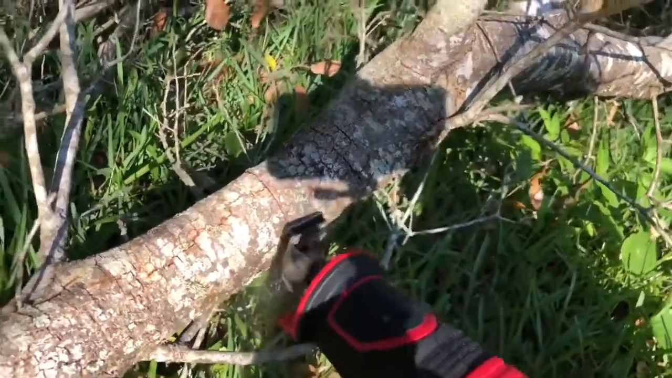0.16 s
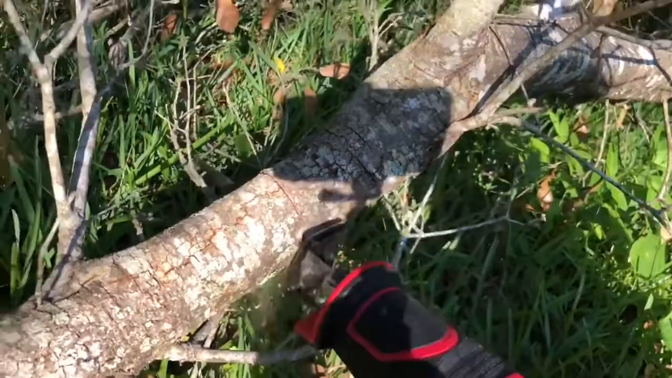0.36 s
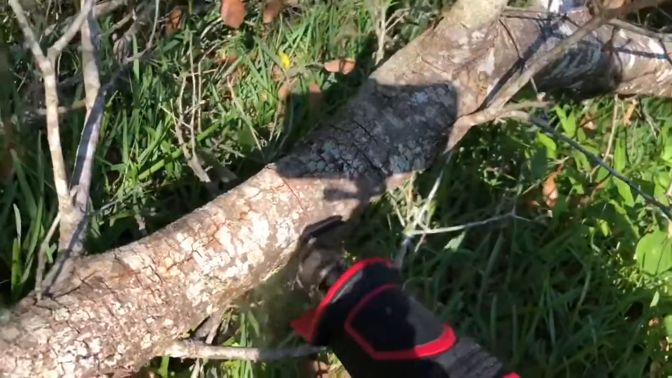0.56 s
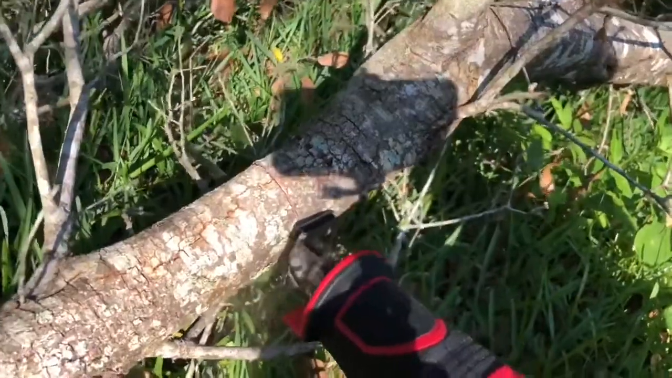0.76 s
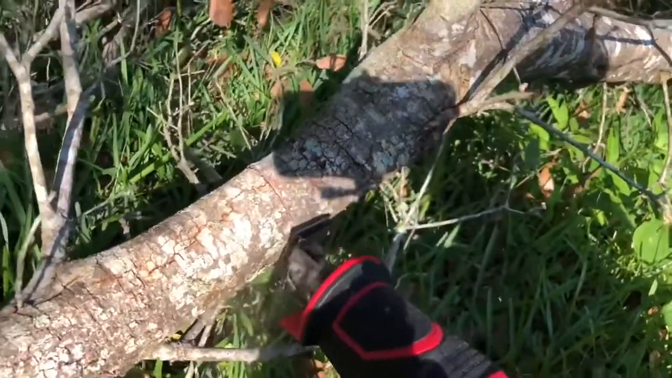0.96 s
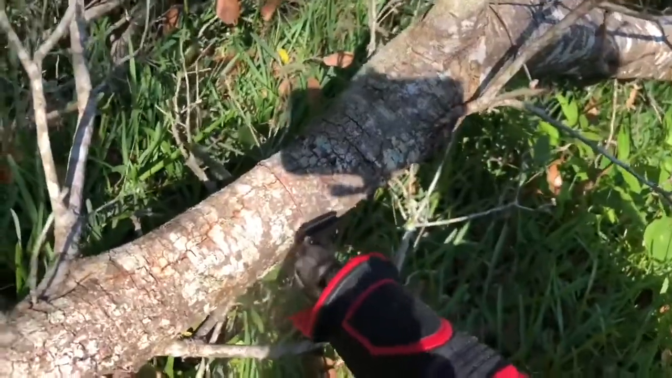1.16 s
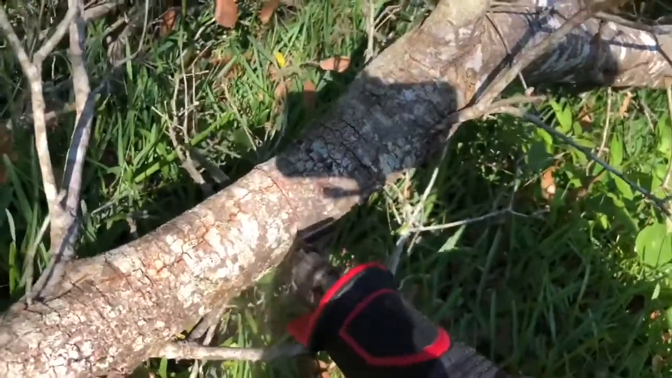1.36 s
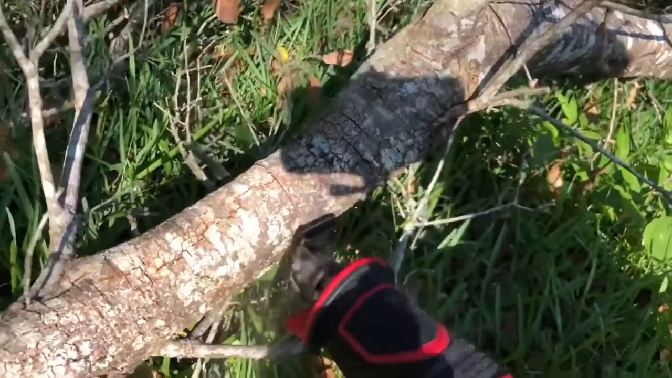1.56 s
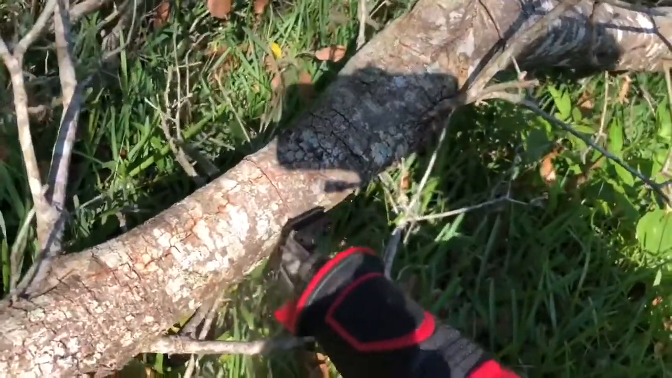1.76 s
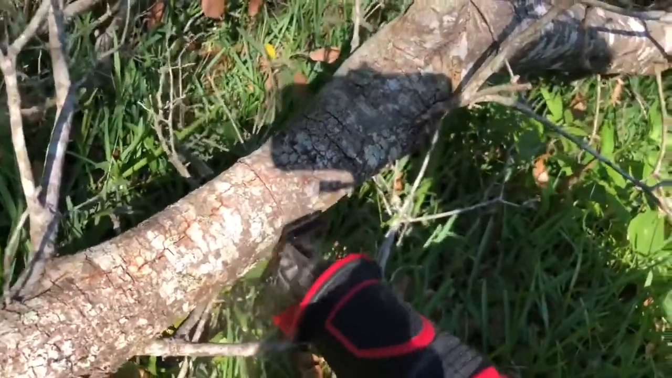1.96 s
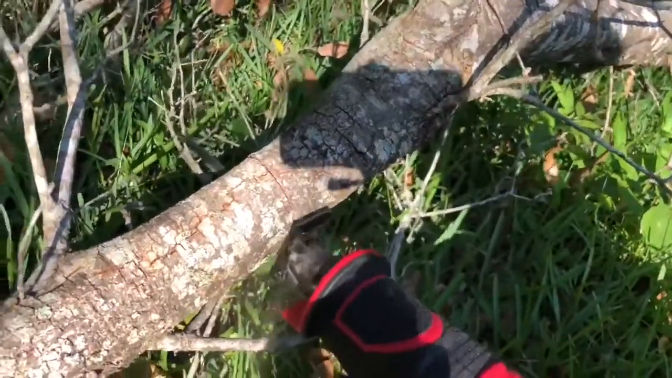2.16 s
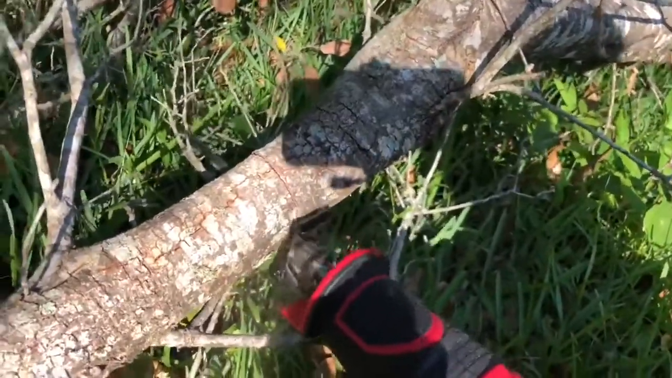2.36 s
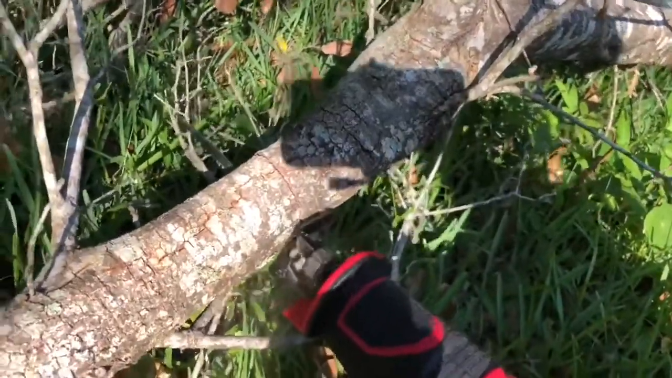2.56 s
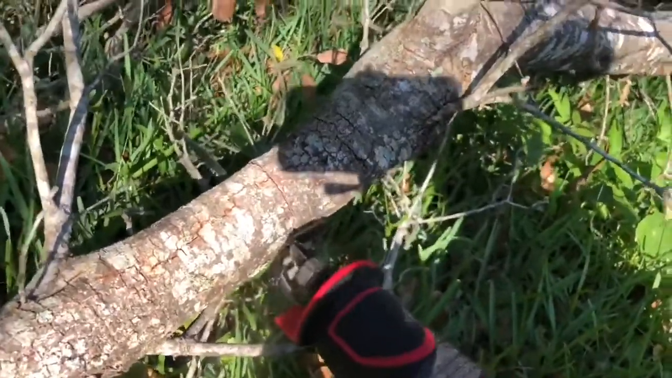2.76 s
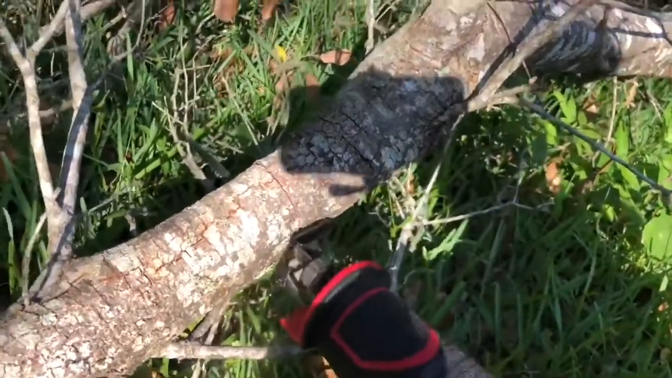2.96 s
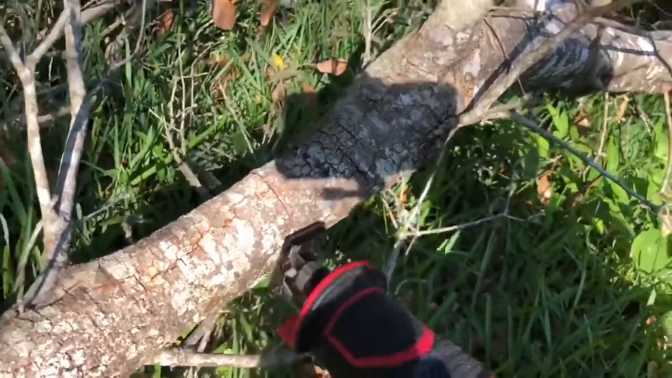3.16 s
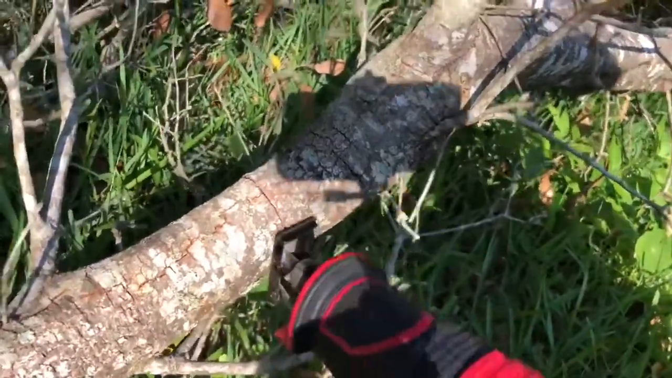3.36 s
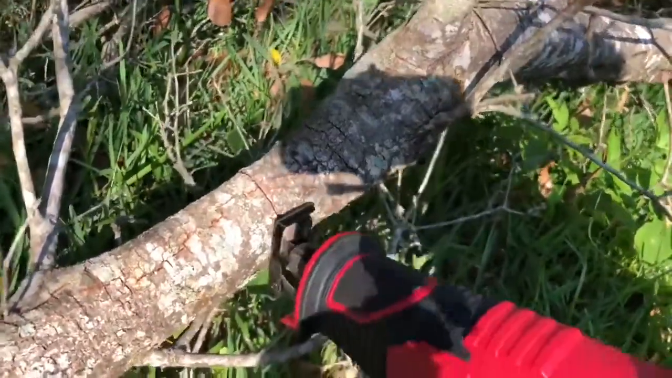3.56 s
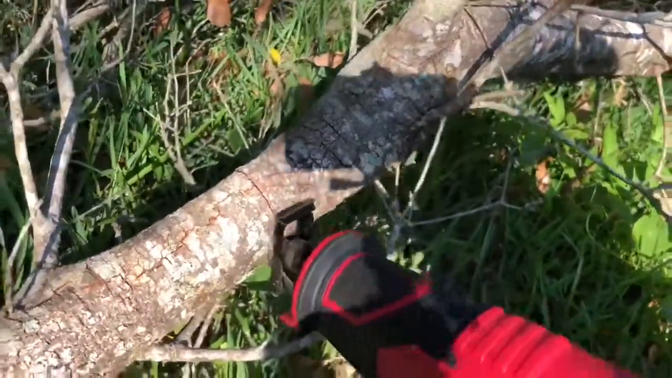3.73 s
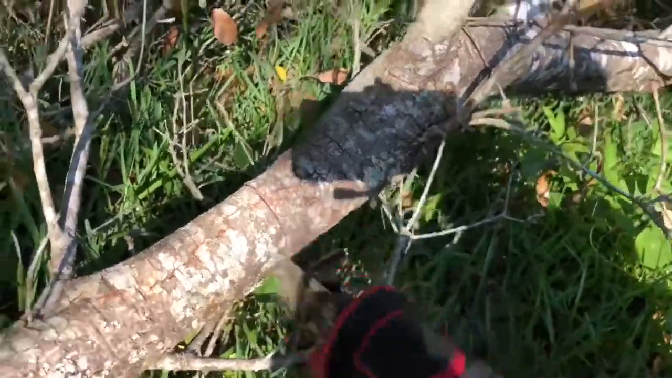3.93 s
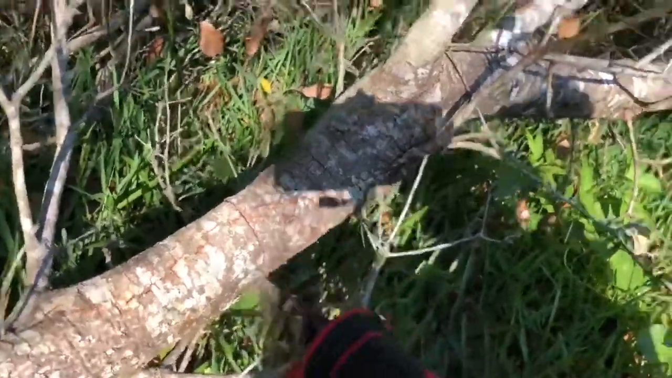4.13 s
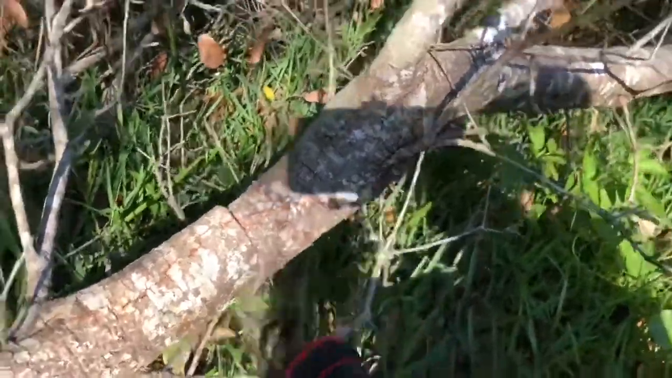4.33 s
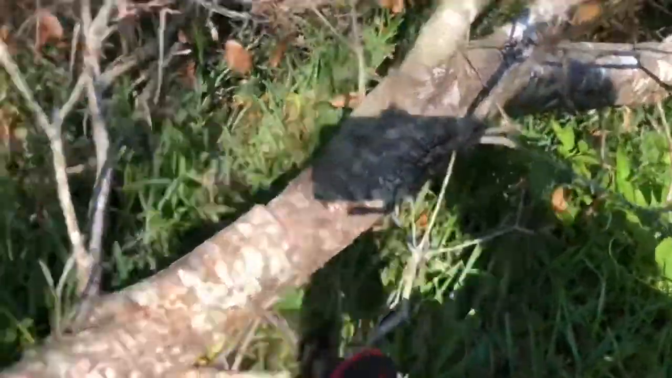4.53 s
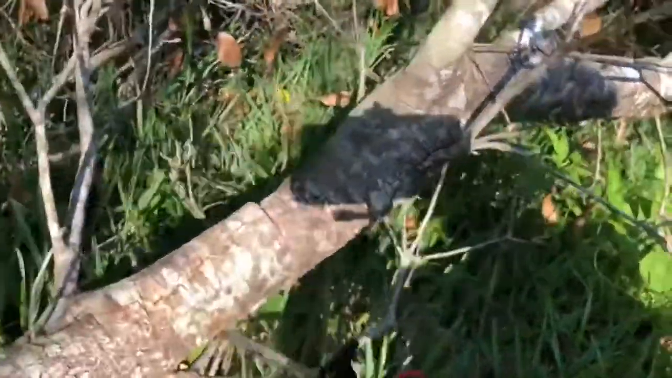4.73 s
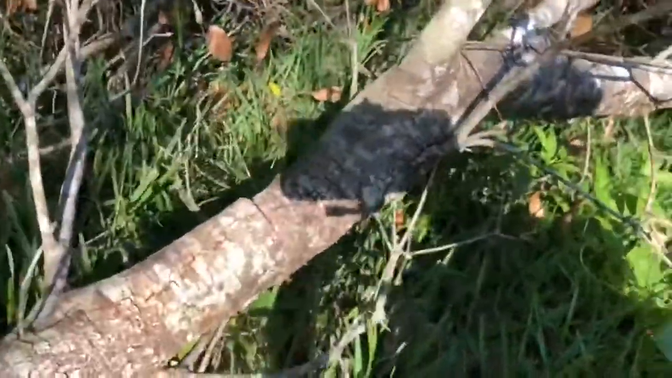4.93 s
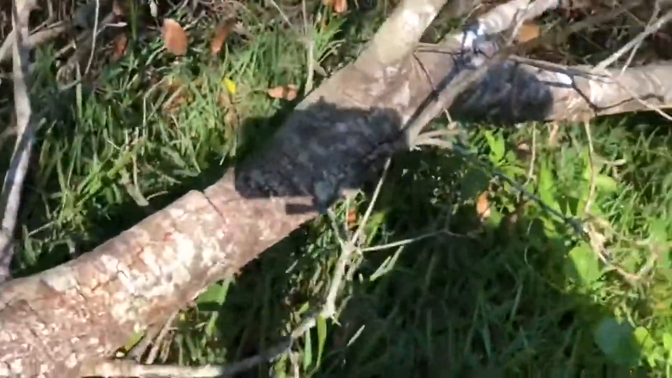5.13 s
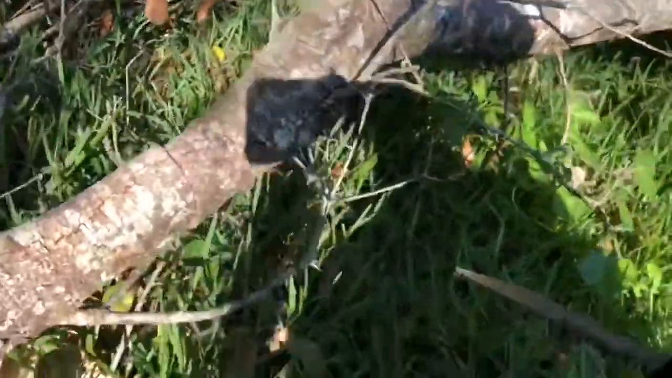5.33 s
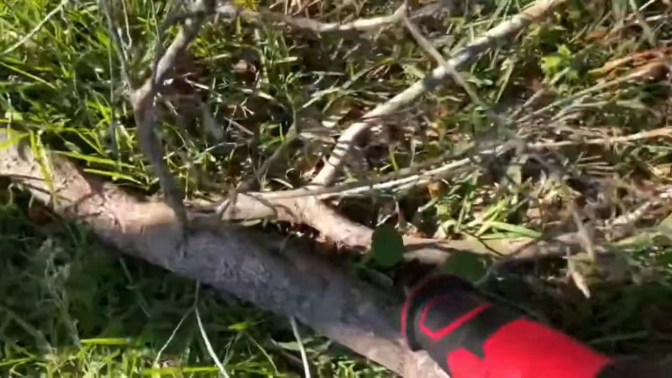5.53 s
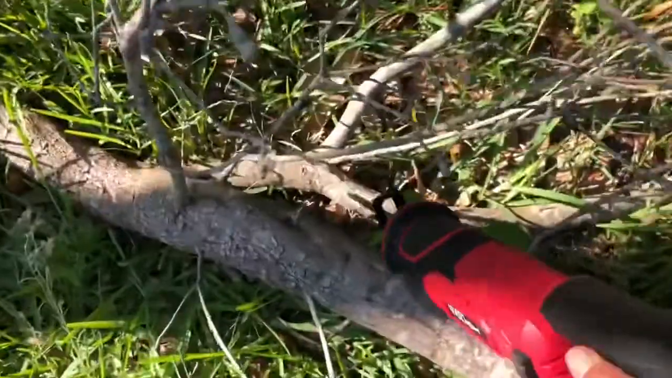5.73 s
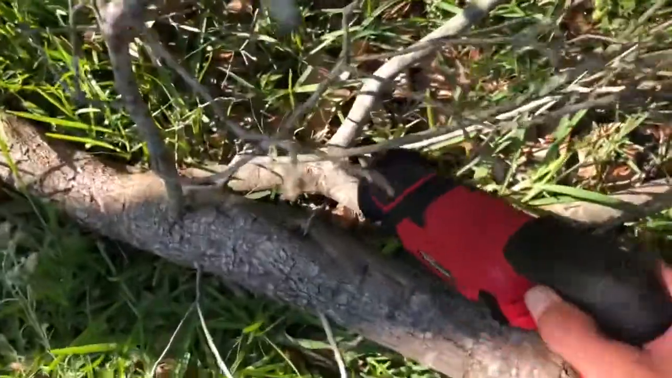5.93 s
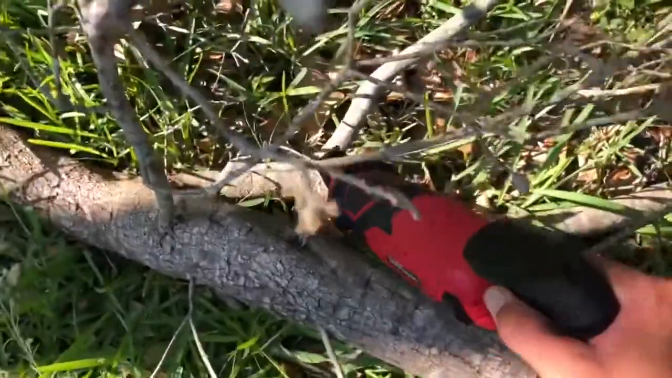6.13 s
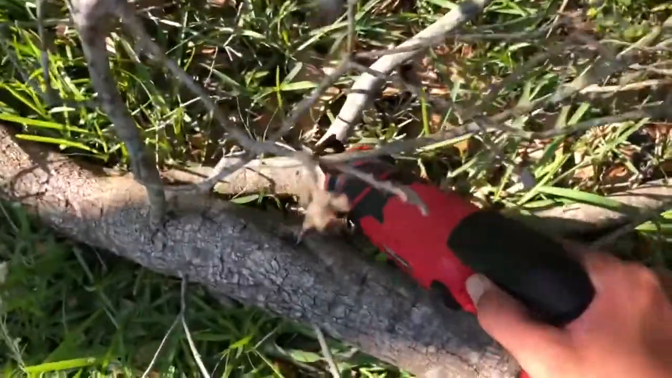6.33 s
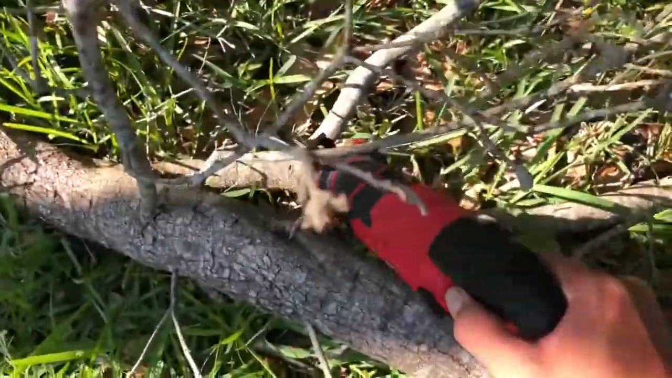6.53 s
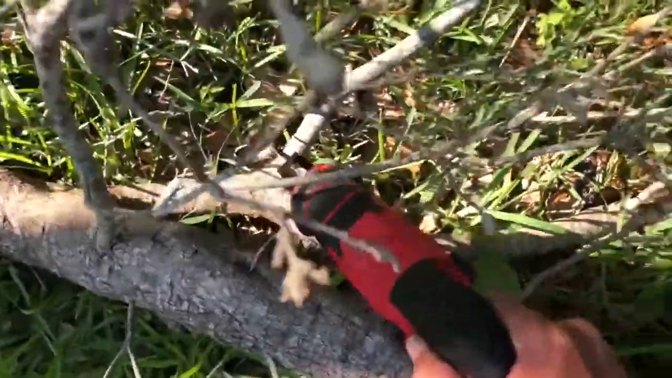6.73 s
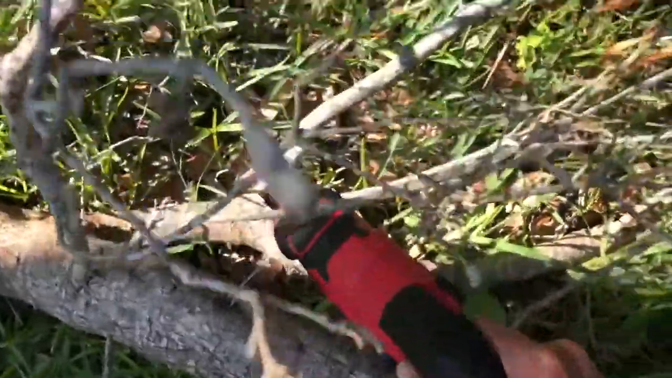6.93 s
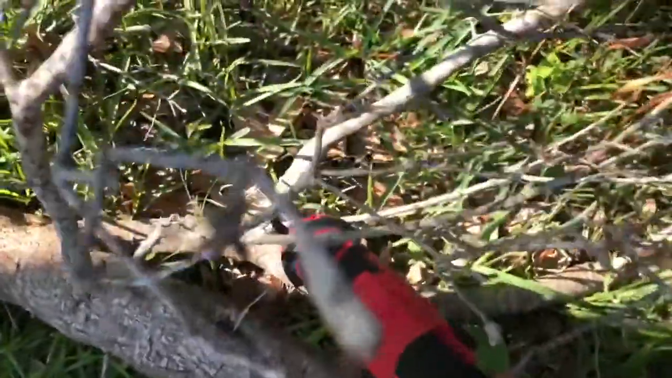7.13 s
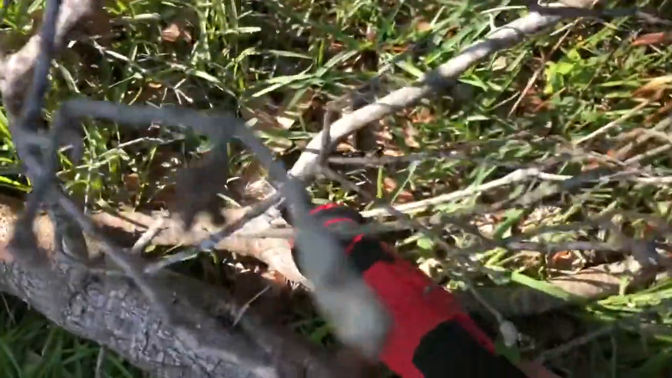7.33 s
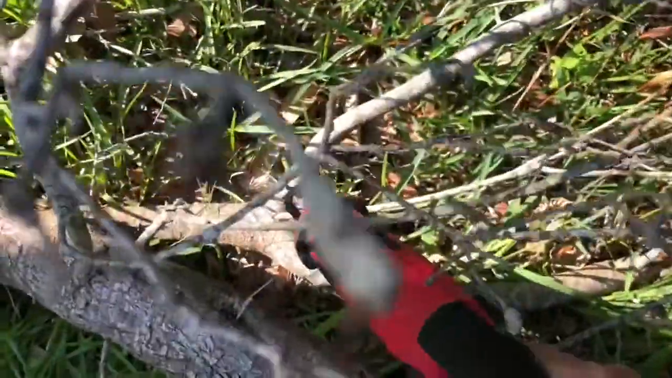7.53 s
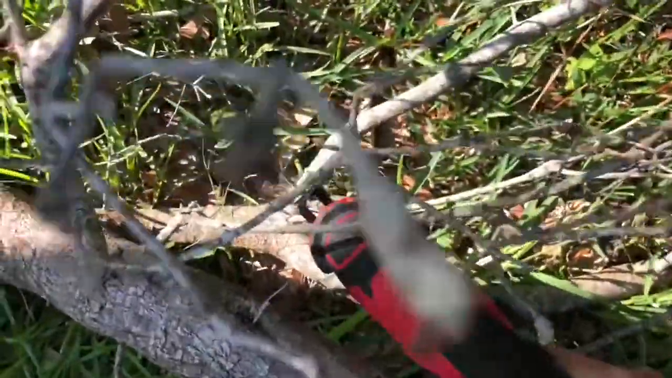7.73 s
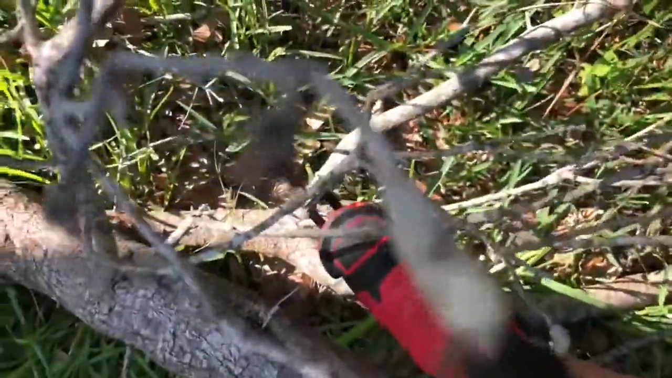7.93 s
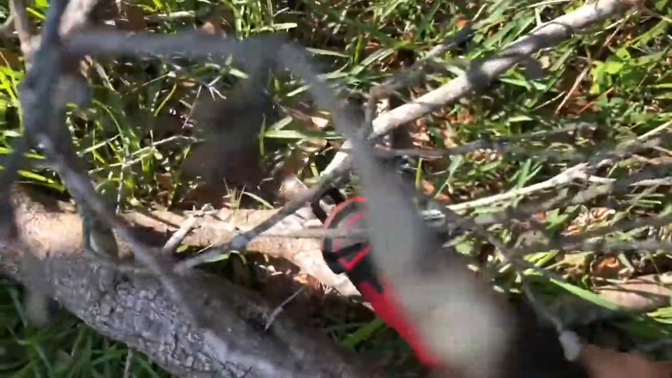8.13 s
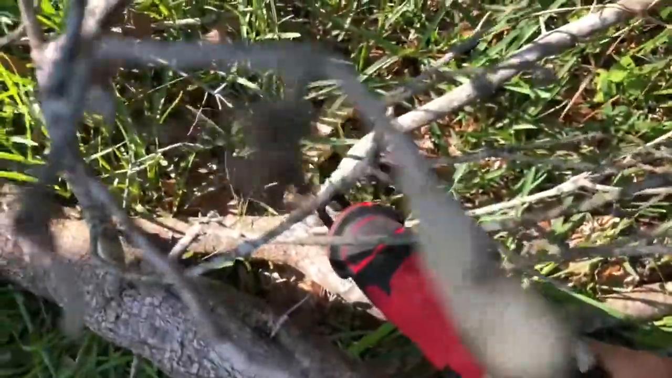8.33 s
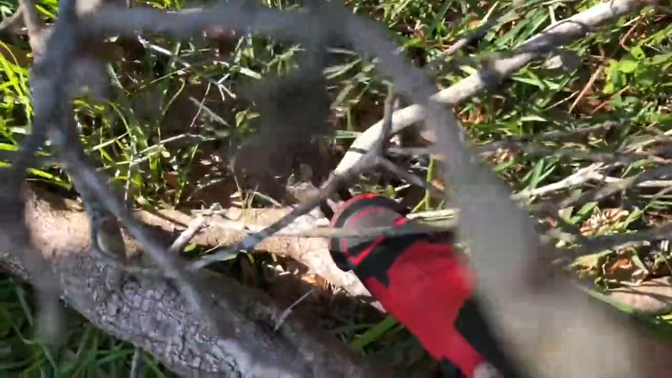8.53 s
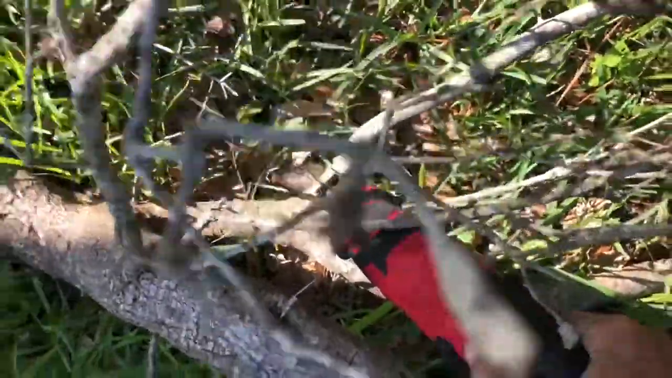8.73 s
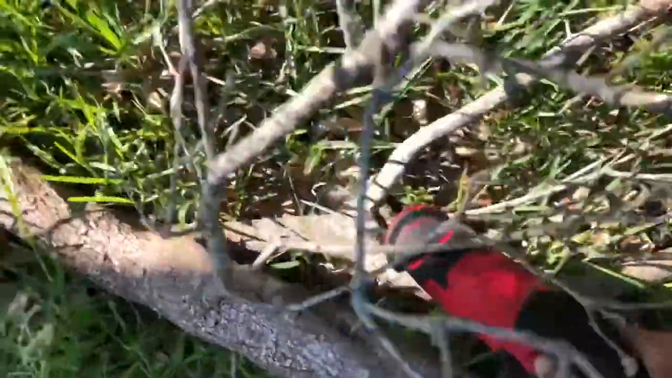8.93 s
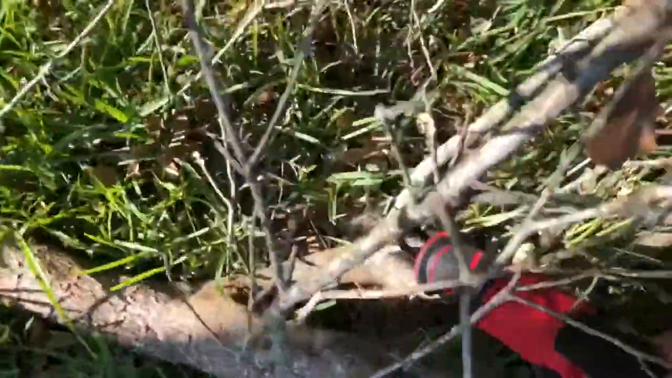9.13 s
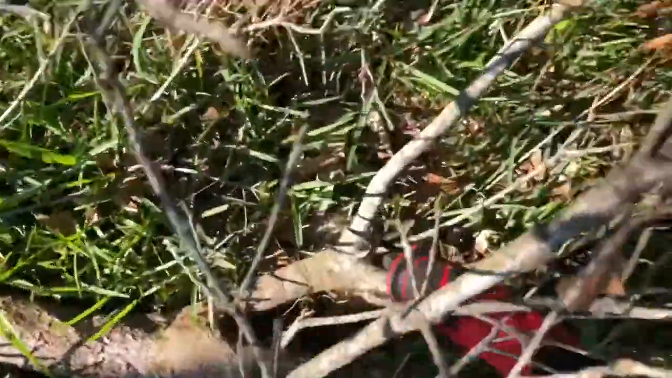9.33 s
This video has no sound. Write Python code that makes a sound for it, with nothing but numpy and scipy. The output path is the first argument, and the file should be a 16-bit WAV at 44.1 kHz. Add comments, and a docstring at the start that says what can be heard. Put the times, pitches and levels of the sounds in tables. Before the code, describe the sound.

Outdoors, a power saw hammers and rasps wood in three bursts, with clunks, motor run-downs and dry twig cracks between them.

```python
"""A cordless reciprocating saw bites twice into a thick fallen limb, then into a thinner branch among dry twigs.
Each stroke gives hard knocks, chatter and tooth rasp, which ring resonances of saw and wood.
The fan runs down after the first two cuts; the third lasts to the end. Decaying bursts form stray knocks.
Twigs rustle, snap, squeak and twang as noise, clicks and tones; shaped noise and low damped modes form
air, low swells and bumps on the microphone; steady sines form the hum of a far engine."""
import sys
import numpy as np
from scipy import signal
from scipy.fft import rfft, irfft, next_fast_len
from scipy.io import wavfile
from scipy.ndimage import uniform_filter1d

SR = 44100
rng = np.random.default_rng(int(sys.argv[2]) if len(sys.argv) > 2 else 0)


def store_pcm(level_fs):
    """Save levels as 16-bit WAV."""
    pcm = np.round(np.clip(level_fs, -1, 1) * 32767).astype(np.int16)
    wavfile.write(sys.argv[1], SR, np.atleast_2d(pcm).T)


N = 413658
T = np.arange(N) / SR  # time, s

# Background: spectra of still air and of the low breeze and swells [f/Hz, relative level/dB]
AIR_COLOUR = [(71, -28), (120, -3), (208, -9.5), (276, -14.5), (360, -15), (829, -15.5), (1870, -27),
              (4390, -29), (11400, -39.5), (15500, -51)]
LOW_COLOUR = [(13, -47), (22, -14.5), (40, -2), (54, -1), (71, -1), (129, -18), (146, -30), (242, -34.5),
              (260, -44), (340, -66.5), (570, -120)]
AIR_DB = -57.5
BREEZE_DB, BREEZE_WANDER_DB, BREEZE_FALL_DB_PER_S = -55.5, 2.5, 0.9
# low swells: gusts on the microphone, and at 7.0 s the crank's low shaking
# [t/s, half length/s, relative level/dB]
LOW_SWELLS = [(2.25, 0.083, -40), (2.52, 0.15, -42.5), (3.02, 0.3, -44), (3.47, 0.044, -42),
              (3.7, 0.095, -42), (4.66, .1, -32.5), (5.29, 0.064, -45.5), (7.0, 0.23, -47)]
# dull bumps on the microphone [t/s, nominal level/dB, f/Hz, decay/s, initial pitch excess/Hz]
BUMPS = [(3.021, -27, 66, .04, 0), (3.81, -26, 65, .03, 2), (4.64, -33, 75, .02, 60),
         (4.705, -18, 62, 0.021, 214), (4.93, -36, 70, 0.016, 120), (5.24, -33, 62, 0.024, 96.5)]
# partials of the far engine [f/Hz, level/dB]
HUM = [(59.2, -62), (118.4, -59.5), (177.6, -58), (242.2, -71), (301.5, -68.5), (360.7, -69)]

# dry twigs and grass brushed aside [t/s, half length/s, relative level/dB]
RUSTLE = [(5.623, 0.052, -45), (5.78, 0.12, -53.5), (6.14, 0.25, -48.5)]
# spectrum of the rustle [f/Hz, relative level/dB]
RUSTLE_COLOUR = [(200, -21), (400, -1.5), (950, -5.5), (1400, -3), (2000, -5), (2900, -3.5), (6800, -4),
                 (12000, -5), (15500, -11)]
RUSTLE_FROM_S = 5.56  # the rustle starts abruptly here
# dry twigs snapping [t/s, peak level/dB, centre f/Hz]
SNAPS = [(5.115, -22.5, 6400), (5.35, -33.5, 8700), (5.454, -37, 3450), (5.802, -23, 7000),
         (5.911, -26, 5800), (5.953, -21, 8000), (6.056, -22, 6500), (6.082, -19.5, 4800),
         (6.143, -21, 6650), (6.188, -23, 6500), (6.353, -16, 3500), (6.428, -26, 5000), (6.443, -26, 3800)]
SNAP_S, SNAP_TAIL_S, SNAP_TAIL_DB = 0.00068, 0.0095, -18  # the break, and the twig shivering after it
# a stem squeaking against the housing [t/s, f/Hz, relative level/dB]
SQUEAK = [(5.72, 1300, -66), (5.83, 1360, -56), (5.9, 1400, -59), (5.97, 1470, -53), (6.05, 1480, -66)]
# modes of a bent twig that springs free [f/Hz, nominal level/dB, decay/s]
TWANG = [(320, -37.5, 0.044), (474, -51, 0.059)]
TWANG_S = 3.115
TICKS_PER_S, TICK_DB = 12, -70  # faint ticks of settling bark and twigs

# blade and shoe knocking on the wood [t/s, relative peak level/dB, centre f/Hz, relative treble level/dB]
TAPS = [(2.634, -18, 800, -22), (2.747, -27.5, 1550, -13), (2.999, -26.5, 1490, -25),
        (3.021, -31.5, 1300, -26), (3.167, -37, 2370, -31), (3.297, -44, 904, -25),
        (3.528, -37.5, 877, -26), (3.559, -33, 2420, -33), (3.698, -46, 880, -23), (3.802, -35, 2600, -27),
        (3.818, -32, 1060, -28), (3.89, -16, 1020, -1), (3.905, -9, 1030, -21), (3.93, -6, 1220, -29),
        (3.962, -4.5, 1560, -23), (4.823, -24, 1740, -17), (4.85, -24, 912, -11), (4.889, -21.5, 842, -10),
        (4.928, -24.5, 1700, -32), (4.95, -28, 1400, -27), (4.973, -27.5, 1690, -27),
        (4.999, -24.5, 1250, -27), (5.826, -25, 961, -5), (6.105, -26.5, 1070, -12), (6.2, -21.5, 2900, 2),
        (6.221, -30, 2620, -12)]
TAP_CYCLES = 5.2  # decay of a knock, in cycles of its centre frequency

# modes of the motor whine as the trigger is squeezed [f/Hz, nominal level/dB, decay/s]
WHINE = [(1960, -42, .08), (3915, -38, .035)]
WHINE_S = 6.625
# motor fan running down after the first two cuts [t/s, level/dB, fall/(dB/s)]
COAST = [(2.62, -39, 52.5), (4.7, -33, 80)]
# spectrum of the fan [f/Hz, relative level/dB]
COAST_COLOUR = [(120, -47), (200, -9), (371, -12), (454, 5), (544, -9), (1510, -2.5), (2470, -4.5),
                (6240, -5), (15500, -13)]
# the heavy limb lurching under the saw and droning [t/s, relative level/dB]
ROCKING = [(.3, -41), (.63, -33), (.87, -29), (1.28, -31), (1.55, -38), (1.9, -29.5), (2.53, -33.5)]
ROCK_S, ROCK_DB = 0.046, -2.5  # half length and gain of a lurch

# nominal crank speed, sagging as the saw is leaned on [t/s, stroke rate/Hz]
SPEED = [(0, 35), (.3, 38.5), (.6, 36.5), (.8, 33.4), (1.4, 34.4), (1.8, 33.4), (2, 34.3), (2.55, 33.1),
         (4, 43), (4.3, 44.8), (6.97, 48.3), (7.3, 46.2), (7.7, 44.5), (8.2, 45.5), (9.38, 44.5)]
CRAWL_SHARE = .5  # share of the nominal speed that is left at zero effort
# pulls of the trigger [start/s, spin-up/s, release/s, braking/s, level/dB, gain per extra stroke rate/(dB/Hz),
# relative treble level/dB, treble drift/(dB/s), relative shaking level/dB]
CUTS = [(-.5, .08, 2.53, .08, -14.5, 0.27, -11, 0.32, -21),
        (3.885, .088, 4.66, .052, -13.7, -0.26, -9.5, -2, -27.5),
        (6.628, .095, 9.6, .08, -14.5, -0.41, -8.5, -1.66, -21.5)]
SPIN_UP_POWER = 1.8  # how S-shaped the start of a cut is
# time constant of the shoe settling on the wood; change of shaking and of knock midrange while fully loose
SINK_S, LOOSE_DB, BOUNCE_DB = 0.73, -9, 5
# knocks within one stroke, on limb and branch [share of the turn, relative level/dB]
LIMB_KNOCKS = [(.03, -3), (0.329, -6), (.53, 1.5), (.83, -2)]
BRANCH_KNOCKS = [(0.119, -5), (0.399, -9.5), (.54, 1), (.85, -4.5)]
# broad spectra of saw and wood in each cut [f/Hz, relative level/dB]
FIRST_COLOUR = [(60, -39), (130, -37.5), (260, -15), (380, -18.5), (520, -6), (700, 0), (1250, 1.5),
                (2050, -2), (3050, -4.5), (4200, -12), (5400, -14), (7700, -12), (10000, -19), (15500, -27)]
SECOND_COLOUR = [(59, -46.5), (100, -32.5), (123, -14), (196, -26), (386, -16.5), (564, -5), (1230, -2),
                 (2040, -4.5), (2520, -5.5), (3120, -6), (3540, -10.5), (3770, -12.5), (5510, -11.5),
                 (7730, -6.5), (15500, -19)]
THIRD_COLOUR = [(60, -54), (150, -37), (250, -22.5), (380, -19.5), (490, -4), (700, -4), (1090, -3.5),
                (2000, -5), (3120, -7.5), (4100, -9), (4860, -7), (5510, -13.5), (7730, -11),
                (15500, -24.5)]
# resonances and dips of blade, shoe and housing pressed on limb and branch [nominal f/Hz, width/Hz, lift/dB]
LIMB_MODES = [(518, 42, 2.5), (685, 130, 1.5), (1250, 96, 2), (1343, 47, -5.5), (1660, 88, 2.5),
              (2556, 210, 7), (3545, 390, 8), (4230, 110, 9), (4700, 150, 6), (5440, 200, -3),
              (6830, 130, 7), (7240, 400, -2), (8650, 170, 7.5), (10660, 320, 4.5), (11500, 130, 5),
              (14400, 900, -2.5)]
BRANCH_MODES = [(493, 88, -1), (1059, 73, 5), (1350, 700, 4), (2017, 63, -9), (2310, 130, 3),
                (3110, 320, 4), (3730, 270, 3.5), (4930, 130, 2), (5960, 350, 4.5), (6720, 150, 8),
                (7300, 290, 3.5), (8060, 130, 4.5), (9300, 710, 6), (10640, 120, 10), (11600, 1500, 2)]
# limb and branch shaken by the crank [multiple of the stroke rate, relative level/dB]
LIMB_SHAKE = [(1, -18), (2, -15.5), (3, -9), (4, -7.5), (5, 1), (7, -0.5), (8, -5.5), (9, -2), (15, 7.5)]
BRANCH_SHAKE = [(1, -17), (4, -14), (6, -7), (7, -5), (8, -2), (9, 1), (10, 2), (11, 0)]
# song of the free blade when lightly loaded [t/s, level against the cut/dB]
BLADE_SONG = [(0, -26), (1.2, -18), (2.5, -14), (3.95, -10), (4.05, -26), (4.7, -24), (6.75, -17.5),
              (7.1, -23), (9.38, -39)]
# teeth skidding over dry fibres with a hiss [t/s, half length/s, strength 0-1]
SKIDS = [(.05, 0.34, 0.1), (4.568, .14, 0.9), (8.413, .26, 0.94), (8.907, 0.091, 0.8)]
# against the cut: steady hiss, hiss of a full skid; treble lift of a full skid
HISS_DB, SKID_HISS_DB, SKID_TREBLE_DB = -42.5, -23.5, 3.5

TOP_HZ = 15750  # upper limit of the sound


def amp(db):
    """Logarithmic level: decibels to amplitude gain."""
    return 10 ** (np.asarray(db) / 20)


def unit(x):
    """Power normalization: scale to rms 1."""
    return x / np.sqrt(np.mean(x ** 2))


def curve(rows, axis=1):
    """Linear interpolation of one table column in time."""
    rows = np.array(rows)
    return np.interp(T, rows[:, 0], rows[:, axis])


def envelope(rows):
    """Amplitude modulation by a level curve, silent outside its span."""
    inside = (T >= rows[0][0]) & (T <= rows[-1][0])
    return amp(curve(rows)) * uniform_filter1d(1. * inside, size=300)


def swell(at, half_s):
    """Gaussian envelope: a bell-shaped rise and fall with a top of 1."""
    return np.exp(-((T - at) / half_s) ** 2)


def noise():
    """White noise: equal mean power at all frequencies."""
    return rng.standard_normal(N)


def walk(rate):
    """Slow random modulation: random points, rate per second, joined by lines with a spread near 1."""
    points = rng.standard_normal(4000)
    return 1.2 * np.interp(T * rate, np.arange(len(points)), points)


def grains(rate, spread_db):
    """Random impulse train: sparse clicks of very unequal size."""
    clicks = rng.random(N) < rate / SR
    sizes = amp(spread_db * np.minimum(rng.exponential(size=N), 4))
    return unit(clicks * np.sign(noise()) * sizes)


def band(x, lo_hz, hi_hz, order=2):
    """Band-pass filtering: keep the range between two cutoff frequencies."""
    edges = [lo_hz, min(hi_hz, SR / 2 - 500)]
    return signal.sosfilt(signal.butter(order, edges, "band", fs=SR, output="sos"), x)


def body(x, colour, modes=(), size=4096):
    """Minimum-phase resonance: ring x through a broad spectrum with modes on top."""
    hz = np.maximum(np.arange(size // 2 + 1) * SR / size, 1)
    points = np.array(colour)
    db = np.interp(np.log(hz), np.log(points[:, 0]), points[:, 1])
    for centre, width, lift in modes:
        db = db + lift / (1 + (2 * (hz - centre) / width) ** 2)
    # folding the cepstrum onto positive time makes the response causal
    cepstrum = irfft(np.log(amp(db)))
    cepstrum[1:size // 2] *= 2
    cepstrum[size // 2 + 1:] = 0
    response = irfft(np.exp(rfft(cepstrum)))
    return unit(signal.fftconvolve(x, response)[:N])


def fade(x, decay_s):
    """Exponential relaxation: give every impulse a decaying tail."""
    return signal.lfilter([1], [1, -np.exp(-1 / (decay_s * SR))], x)


def ring(start, hz, db, decay_s, rise_s, sag_hz=0):
    """Damped oscillation: one mode that starts sag_hz higher and falls to its pitch."""
    age = np.maximum(T - start, 0)
    cycles = hz * age + sag_hz * .011 * (1 - np.exp(-age / .011))
    return amp(db) * (1 - np.exp(-age / rise_s)) * np.exp(-age / decay_s) * np.sin(2 * np.pi * cycles)


def bend(x, lag_s, soft_hz):
    """Dispersion of bending waves in wood: highs arrive first (lag_s at 1 kHz), damped above soft_hz."""
    size = next_fast_len(N + SR // 10)
    hz = np.arange(size // 2 + 1) * SR / size
    phase = 4 * np.pi * lag_s * np.sqrt(1000 * hz)
    damping = 0.61 + 0.21 / (1 + (hz / soft_hz) ** 4)
    return irfft(rfft(x, size) * np.exp(-1j * phase) * damping, size)[:N]


def still_air():
    """Broadband ambience: filtered noise of slowly wandering level."""
    return amp(AIR_DB + 1 * walk(6.2)) * body(noise(), AIR_COLOUR)


def low_air():
    """Amplitude-modulated low noise: a slowly dropping breeze with separate low swells on top."""
    breeze = amp(BREEZE_DB - BREEZE_FALL_DB_PER_S * T + BREEZE_WANDER_DB * walk(8))
    swells = amp(-3.5) * sum(amp(db) * swell(at, half_s) for at, half_s, db in LOW_SWELLS)
    return body(noise(), LOW_COLOUR) * (breeze + swells)


def bumps():
    """Impulse response of a low mode: a soft blow on the microphone rings and sags in pitch."""
    return sum(ring(start, hz, db, decay, 0.005, sag) for start, db, hz, decay, sag in BUMPS)


def far_engine():
    """Periodic source: partials share one speed wander, and the hum comes up halfway through."""
    revs = np.cumsum(1 + .002 * walk(2.8)) / SR
    hum = 0
    for hz, db in HUM:
        level = amp(db + 1.5 * walk(4)) * np.sqrt(2)
        hum = hum + level * np.sin(2 * np.pi * (hz * revs + rng.random()))
    return hum * np.interp(T, [4.6, 5.6], [.2, 1])


def background():
    """Superposition of air, low swells, bumps on the microphone and the far engine."""
    return still_air() + low_air() + bumps() + far_engine()


def rustle():
    """Friction noise: dry stems scrape and crackle, shaped by each brushing movement."""
    stems = body(noise() + 1.8 * grains(900, 5.1), RUSTLE_COLOUR) * amp(1.2 * walk(60) + 6)
    brushing = sum(amp(db) * swell(at, half_s) for at, half_s, db in RUSTLE)
    return stems * brushing * (T > RUSTLE_FROM_S)


def snaps(size=3000):
    """Brittle fracture: a twig breaks with one sharp, wide click and shivers briefly."""
    out, age = np.zeros(N + size), np.arange(size) / SR
    for start, db, hz in SNAPS:
        shape = np.exp(-age / SNAP_S) + amp(SNAP_TAIL_DB) * np.exp(-age / SNAP_TAIL_S)
        crack = rng.standard_normal(size) * shape
        snap = band(band(crack, 0.71 * hz, 1.43 * hz, order=1), 1840, 18500)
        at = int(start * SR)
        out[at:at + size] += amp(db) * snap / np.abs(snap).max()
    return out[:N]


def squeak():
    """Friction tone: a stem sounds one unsteady pitch against the housing."""
    hz = curve(SQUEAK) * (1 + 0.0625 * walk(400))
    tone = np.sin(2 * np.pi * np.cumsum(hz) / SR) * amp(4 * walk(120) - 1)
    return tone * envelope(np.array(SQUEAK)[:, ::2])


def twang():
    """Free vibration: a bent twig springs loose and rings in its modes."""
    return sum(ring(TWANG_S, hz, db, decay, .02) for hz, db, decay in TWANG)


def ticks():
    """Random small impulses: bark and twigs tick as they settle."""
    clicks = fade(grains(TICKS_PER_S, 2.7), .005) * noise()
    return amp(TICK_DB) * unit(band(clicks, 700, 4000))


def twigs():
    """Superposition of the friction, fracture and free vibration of dry stems."""
    return rustle() + snaps() + squeak() + twang() + ticks()


def taps(tail_db, tail_s, wood_db, snap_db, gain_db, size=4000):
    """Impact sound: a cracking burst near one pitch, with a woody knock and a bright snap."""
    out, age = np.zeros(N + size), np.arange(size) / SR
    for start, db, hz, treble_db in TAPS:
        decay = np.exp(-age * hz / TAP_CYCLES) + amp(tail_db) * np.exp(-age / tail_s)
        crack = rng.standard_normal(size) * (1 - np.exp(-age * hz / 0.92)) * decay
        tap = unit(band(crack, 0.59 * hz, 1.26 * hz))
        tap = tap + amp(wood_db) * unit(band(crack, 330, 3800))
        tap = tap + amp(treble_db + snap_db) * unit(band(crack, 5660, 13000))
        at = int(start * SR)
        out[at:at + size] += amp(db + gain_db) * tap / np.abs(tap).max()
    return out[:N]


def motor_whine():
    """Damped tones: the motor whines briefly as the trigger is squeezed."""
    return sum(ring(WHINE_S, hz, db, decay, 0.0047) for hz, db, decay in WHINE)


def fan_run_down():
    """Exponential decay of fan noise: its level falls at a steady rate in dB/s after release."""
    fan = body(noise() + 0.6 * grains(500, 4.5), COAST_COLOUR) * amp(1.6 * walk(60))
    return fan * sum((T > at) * amp(db - fall * np.maximum(T - at, 0)) for at, db, fall in COAST)


def limb_drone(force):
    """Selective resonance: each lurch of the limb lifts the low band of the sawing force."""
    lurches = sum(amp(db + ROCK_DB) * swell(at, ROCK_S) for at, db in ROCKING)
    return unit(band(force, 140, 320, order=3)) * lurches


def drive(start, spin_up_s, release, braking_s):
    """Rotor inertia: motor effort 0-1 spins up, holds, and is braked on release."""
    rise = 1 - np.exp(-(np.maximum(T - start, 0) / spin_up_s) ** SPIN_UP_POWER)
    return rise * np.exp(-(np.maximum(T - release, 0) / braking_s) ** 2)


def looseness():
    """Contact relaxation: 1 as each cut starts, decaying as the shoe settles on the wood."""
    starts = np.array([row[0] for row in CUTS])
    return np.exp(-(T - starts[np.searchsorted(starts, T) - 1]) / SINK_S)


def strokes(turns, knocks, slop, scatter_db, chatter_db, chatter_s, rasp_db, bite_s, size=600):
    """Periodic impact and friction: knocks in each turn, their chatter, and teeth tearing fibres."""
    blows, knocking = 0, 0
    whole = np.arange(int(turns[-1]))
    for place, db in knocks:
        chance = rng.standard_normal((600, 2))[:len(whole)]
        at = np.searchsorted(turns, whole + place + slop * chance[:, 0])
        hit_gains = amp(db + scatter_db * np.clip(chance[:, 1], -2, 1.2))
        hits = np.bincount(at, hit_gains, N + 1)[:N]
        # each contact rattles the loose shoe, partly in the same way on every stroke
        rattle = rng.standard_normal(size) * np.exp(-np.arange(size) / (chatter_s * SR))
        chatter = signal.fftconvolve(hits, rattle)[:N] + fade(hits, chatter_s) * noise()
        knocking = knocking + hits + amp(chatter_db) * chatter / np.sqrt(chatter_s * SR)
        blows = blows + hits
    # the teeth dig in around each knock and run fastest twice a turn
    digging = unit(uniform_filter1d(fade(blows, bite_s), size=130))
    tooth_speed = np.abs(np.sin(2 * np.pi * (turns - .28)))
    bite = digging + .5 * tooth_speed + 0.45
    # single teeth snag on fibres
    snags = bend(grains(1600, 2.5), lag_s=.0004, soft_hz=9000)
    rasp = bite * (noise() + .8 * snags)
    blow = bend(knocking - knocking.mean(), lag_s=0.0010976, soft_hz=4470)
    blow = blow + (amp(BOUNCE_DB * looseness()) - 1) * band(blow, 600, 5500, order=1)
    return unit(blow) + amp(rasp_db) * unit(rasp)


def sliding_resonance(force, colour, modes):
    """Modal tuning by free length: sliding contact crossfades a long and a short blade."""
    slide = np.pi / 4 * (1 + np.tanh(walk(5)))
    longer = body(force, colour, [(hz * .991, width, db) for hz, width, db in modes])
    shorter = body(force, colour, [(hz * 1.009, width, db) for hz, width, db in modes])
    return np.cos(slide) ** 2 * longer + np.sin(slide) ** 2 * shorter


def crank_shake(turns, orders, shaking_db):
    """Forced vibration: the crank shakes the wood at multiples of the stroke rate."""
    shake = 0
    for multiple, db in orders:
        phase = 2 * np.pi * (multiple * turns + rng.random())
        shake = shake + amp(db + 3 * walk(7)) * np.sin(phase)
    return amp(shaking_db + LOOSE_DB * looseness()) * unit(shake)


def cut(force, turns, row, colour, modes, orders, wood_db, teeth_db):
    """Source and resonator: force rings saw and wood with the drive, and skids brighten it."""
    start, spin_up_s, release, braking_s, level_db, pace_db, treble_db, drift_db, shaking_db = row
    sound = sliding_resonance(force, colour, modes)
    low = signal.sosfiltfilt(signal.butter(4, 5250, fs=SR, output="sos"), sound)
    cutting, age = (T > start) & (T < release), np.clip(T - start, 0, release - start)
    parts = low, sound - low, band(force, 7070, 7690), band(force, 10500, 14500)
    wood, teeth, blade, hiss = (part / part[cutting].std() for part in parts)
    shake = crank_shake(turns, orders, shaking_db)
    skid = sum(strength * swell(at, half_s) for at, half_s, strength in SKIDS)
    treble = amp(treble_db + teeth_db + drift_db * age + SKID_TREBLE_DB * skid) * teeth
    treble = treble + amp(curve(BLADE_SONG) + 2 * walk(9)) * blade
    treble = treble + (amp(HISS_DB) + amp(SKID_HISS_DB) * skid) * hiss
    speed = curve(SPEED)
    pace_gain = amp(level_db + pace_db * (speed - speed[cutting].mean()))
    gain = pace_gain * drive(start, spin_up_s, release, braking_s)
    return gain * (amp(wood_db) * wood + treble + shake)


def saw():
    """Crank-driven excitation: three bursts at a wavering speed, with limb drone and fan run-down."""
    effort = sum(drive(*row[:4]) for row in CUTS)
    rate_hz = curve(SPEED) * (CRAWL_SHARE + (1 - CRAWL_SHARE) * effort)
    turns = np.cumsum(rate_hz * (1 + .011 * walk(11))) / SR
    first = strokes(turns, LIMB_KNOCKS, slop=.008, scatter_db=2.5,
                    chatter_db=-3, chatter_s=.0012, rasp_db=4.8, bite_s=.006)
    second = strokes(turns, LIMB_KNOCKS, slop=.02, scatter_db=3.2,
                     chatter_db=-3, chatter_s=.001, rasp_db=6.5, bite_s=.006)
    third = strokes(turns, BRANCH_KNOCKS, slop=.018, scatter_db=3,
                    chatter_db=1, chatter_s=.0015, rasp_db=9.5, bite_s=.006)
    out = cut(first, turns, CUTS[0], FIRST_COLOUR, LIMB_MODES, LIMB_SHAKE, wood_db=-0.12, teeth_db=1.5)
    out = out + cut(second, turns, CUTS[1], SECOND_COLOUR, LIMB_MODES, LIMB_SHAKE, wood_db=0.25, teeth_db=0.5)
    out = out + cut(third, turns, CUTS[2], THIRD_COLOUR, BRANCH_MODES, BRANCH_SHAKE, wood_db=0, teeth_db=3)
    return out + limb_drone(first) + fan_run_down()


def scene():
    """Linear superposition of the background, the brushwood, the knocks and the saw."""
    knocks = taps(tail_db=-14, tail_s=0.022, wood_db=0.5, snap_db=-1.0, gain_db=-3.5)
    return (background() + twigs() + knocks + motor_whine() + saw())[None]


def record(dry):
    """Band limiting and saturation: the deepest bass drops, high peaks are rounded, the top is cut."""
    thin = signal.sosfilt(signal.butter(3, 32, "high", fs=SR, output="sos"), dry)
    rounded = thin / (1 + (np.abs(thin) / .9) ** 4) ** (1 / 4)
    return signal.sosfilt(signal.ellip(10, .2, 80, TOP_HZ, fs=SR, output="sos"), rounded)


dry = scene()
out = record(dry)
store_pcm(out)
```